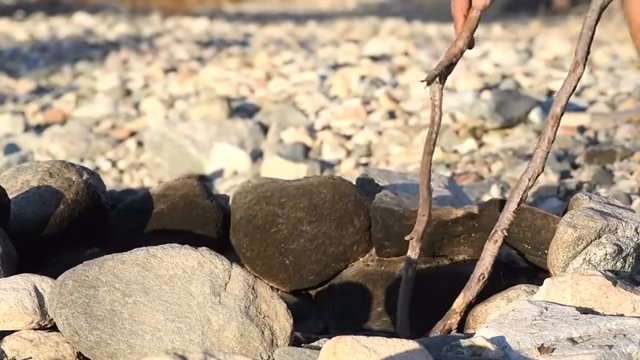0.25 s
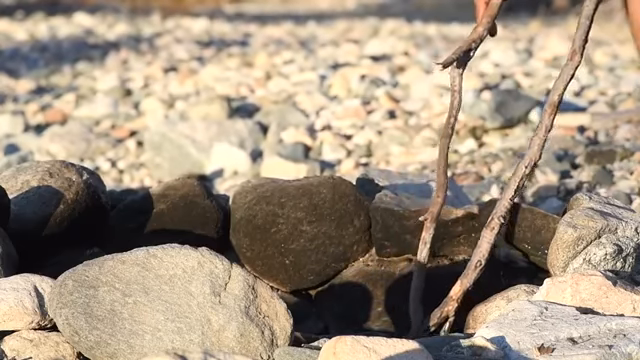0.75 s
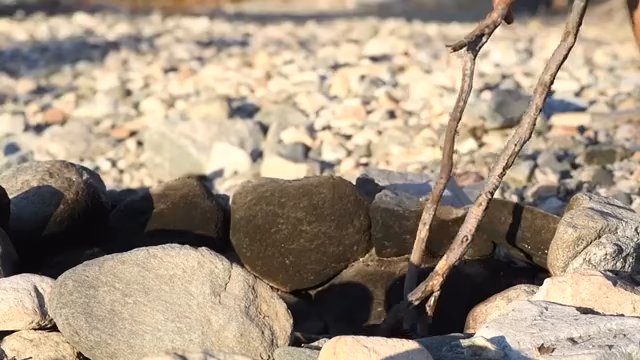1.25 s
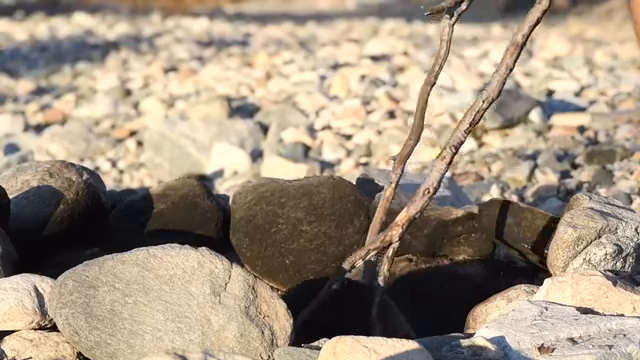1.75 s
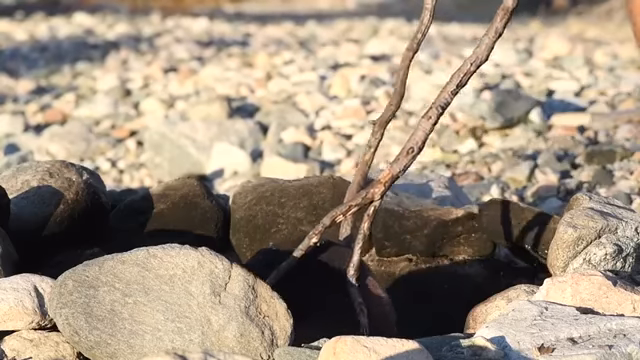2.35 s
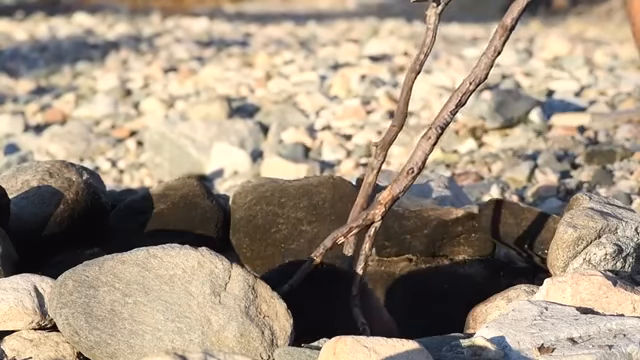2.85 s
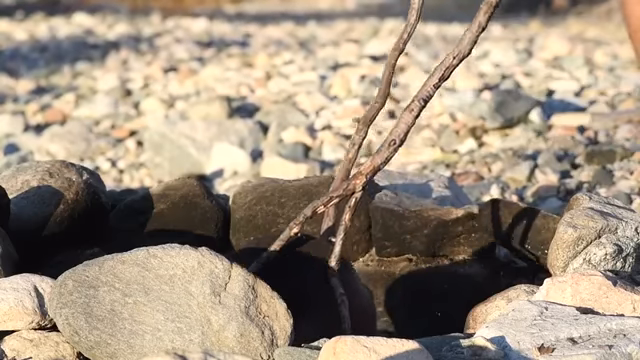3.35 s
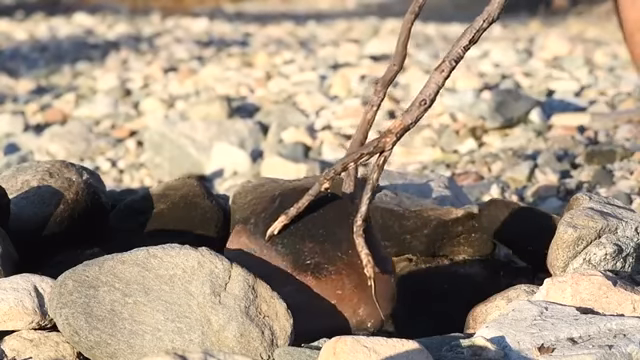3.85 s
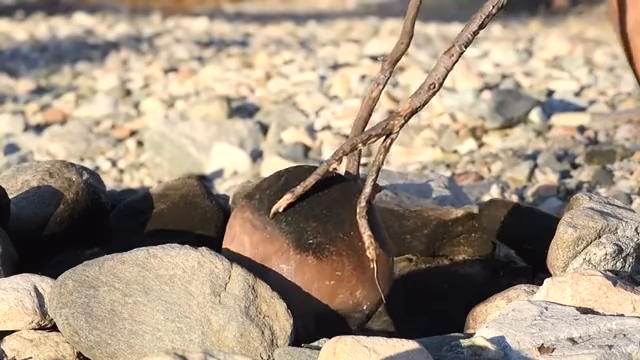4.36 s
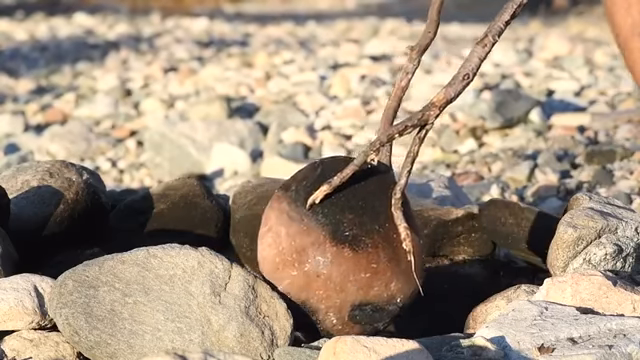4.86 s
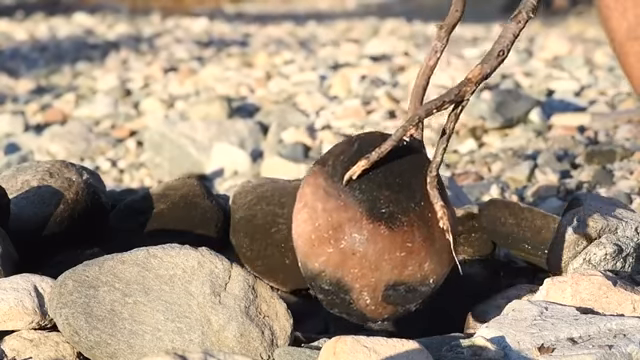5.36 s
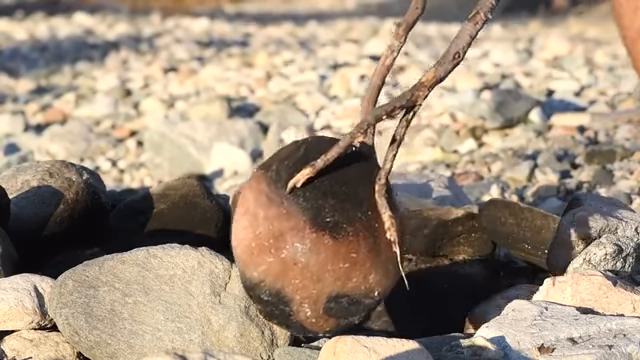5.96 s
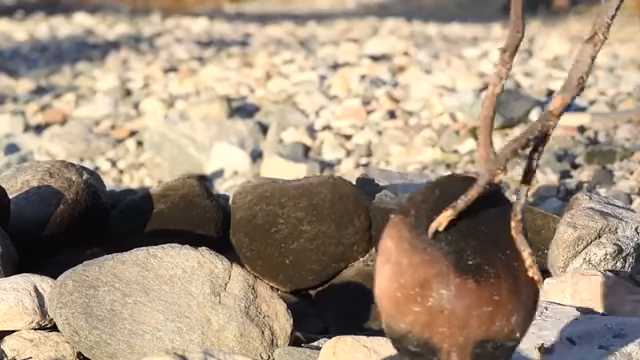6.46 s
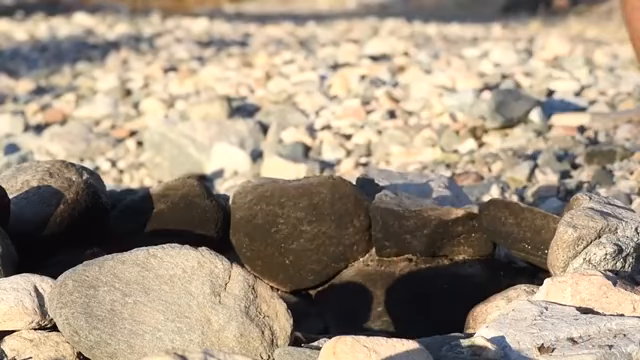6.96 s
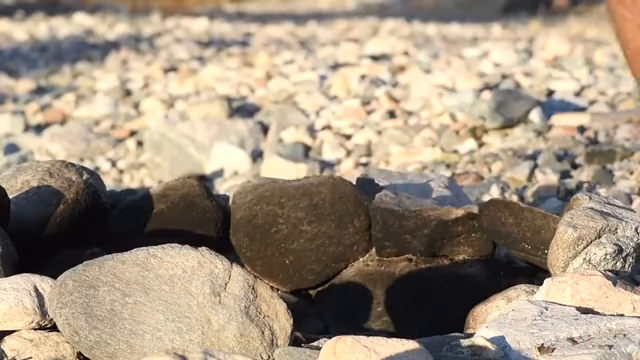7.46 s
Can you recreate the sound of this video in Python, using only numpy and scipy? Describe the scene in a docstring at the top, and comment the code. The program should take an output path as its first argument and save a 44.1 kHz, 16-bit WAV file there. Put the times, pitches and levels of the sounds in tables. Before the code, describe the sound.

A quiet open-air pebble shore, heard close in stereo with faint steady hiss and low rumble. At about 0.1 s a stick and clay pot knock hollowly against stone, ringing briefly with a low hum. Until 1 s, bark rasps over the clay in short dry strokes with little snags around 0.5 s. From 1.1 to 1.4 s the pot grinds grittily, knocks and faintly squeals. Soft, airy rubs follow near 2 s. Around 2.6 s come small taps, then a hard bright clack at 2.75 s. A quiet gap has faint ticks and a light foot contact at 3.2 s. At 3.95 s a low thud and fading scrape; at 4.7 s another thud, rough grinding and short ceramic squeals until 4.85 s. Then mostly quiet: tiny pebble ticks, soft air puff near 6.1 s, and treads crunching gravel from 6.6 s, strongest near 7.6 s.

```python
"""A round clay pot is worked out of a stone hearth by two sticks, on a pebbly shore.
Its knocks are noise bursts over ringing resonators; its grinding is random slips driving the same modes.
Under them pot and ground hum and thump as wavering low sines; single modes squeal; the sticks rub and snag
as grainy noise. Twigs, pebbles and a foot's first contact tick as bursts; feet shift on gravel as noise swells.
Outdoors, steady coloured noise makes a quiet hiss and rumble, with a few puffs of air."""
import sys
import numpy as np
from scipy import signal
from scipy.fft import rfft, irfft
from scipy.io import wavfile

SR = 44100
rng = np.random.default_rng(int(sys.argv[2]) if len(sys.argv) > 2 else 0)


def master_out(mix):
    """Clip the mix to full scale and print it as 16-bit PCM to the path in sys.argv[1]."""
    frames = np.transpose(np.atleast_2d(mix))
    ceiling = np.clip(frames, -1, 1)
    pcm = np.round(ceiling * 32767).astype(np.int16)
    wavfile.write(sys.argv[1], SR, pcm)


N = 339570   # length [samples]
TIME = np.arange(N) / SR   # [s]


def from_db(db):
    """Level: amplitude ratio of a level in dB."""
    return 10 ** (np.asarray(db) / 20)


def rms_one(x):
    """Normalisation: scale to an rms of 1."""
    return x / np.sqrt(np.mean(x ** 2) + 1e-20)


def noise():
    """White noise: equal mean power at all frequencies."""
    return rng.standard_normal(N)


def colour(x, points):
    """Spectral shaping: weight a signal by a curve (frequency [Hz], level [dB]); rms 1."""
    hz, db = np.transpose(points)
    bins = np.maximum(np.fft.rfftfreq(N, 1 / SR), 1)
    gain = from_db(np.interp(np.log(bins), np.log(hz), db))
    return rms_one(irfft(rfft(x) * gain, N))


def butter(x, hz, kind, order=2):
    """Filtering: maximally flat low-pass or high-pass."""
    sos = signal.butter(order, min(hz, SR / 2 - 1), kind, fs=SR, output="sos")
    return signal.sosfilt(sos, x)


def drift(rate):
    """Random modulation: chance values at a rate per second, joined by lines; rms 1."""
    return rms_one(np.interp(TIME * rate, np.arange(N), noise()))


def decay(age, t60):
    """Exponential decay: a fall of 60 dB in t60 seconds."""
    return np.exp(-np.log(1000) * age / t60)


def swell(s, half):
    """Gaussian envelope: a smooth rise and fall about a time."""
    return np.exp(-.5 * ((TIME - s) / half) ** 2)


def held(start, end, rise_s, t60):
    """Driven, then free response: rise, hold while driven, then die away."""
    rise = np.clip((TIME - start) / rise_s, 0, 1)
    return rise * decay(np.maximum(TIME - end, 0), t60)


def swells(times, halves, levels_db):
    """Superposition: the sum of Gaussian envelopes."""
    return sum(from_db(db) * swell(s, half) for s, half, db in zip(times, halves, levels_db))


def grains(per_s, spread_db):
    """Shot noise: random tiny impulses of uneven size and either sign; rms 1."""
    sizes = from_db(spread_db * np.minimum(rng.exponential(1, N), 4))
    signs = rng.choice([-1, 1], N)
    return rms_one(sizes * signs * (rng.random(N) < per_s / SR))


def clicks(times, levels_db):
    """Impulsive force: one sample per blow."""
    out = np.zeros(N)
    np.add.at(out, np.round(times * SR).astype(int), from_db(levels_db))
    return out


def ring(force, modes):
    """Modal superposition: each mode answers the force as a damped two-pole resonator."""
    out = np.zeros(N)
    for hz, db, t60 in modes:
        radius, angle = from_db(-60 / (t60 * SR)), 2 * np.pi * hz / SR
        poles = [1, -2 * radius * np.cos(angle), radius * radius]
        out += from_db(db) * signal.lfilter([0, np.sin(angle)], poles, force + 1e-18)
    return out


WANDER_DB, WANDER_PER_S = 2.8, 35


def driven(force, modes):
    """Forced vibration: a rough force at a wandering contact; a force of rms 1 gives about rms 1."""
    power = sum(from_db(2 * db) * t60 * SR / (4 * np.log(1000)) for hz, db, t60 in modes)
    out = 0
    for mode in modes:
        # as the contact point moves, each mode's share keeps changing
        share = rms_one(from_db(WANDER_DB * drift(WANDER_PER_S)))
        out = out + ring(force * share, [mode])
    return out / np.sqrt(power)


def crowded(x, t60):
    """High modal density: many weak, close modes answer as decaying noise of unit energy."""
    age = TIME[:SR // 4]
    tail = rng.standard_normal(len(age)) * decay(age, t60)
    return signal.fftconvolve(x, tail / np.linalg.norm(tail))[:N]


def cracks(times, levels_db, centres_hz, t60s, octaves, rise_s, tail_db=-22, tail_t60=0.088):
    """Heavily damped dense modes: a short noise burst, then faint scatter among the stones."""
    age = TIME[:SR // 4]
    out = np.zeros(N + len(age))
    for s, db, hz, t60, width in np.broadcast(times, levels_db, centres_hz, t60s, octaves):
        edges = np.minimum(hz * 2 ** (np.array([-.5, .5]) * width), .45 * SR)
        dying = decay(age, t60) + from_db(tail_db) * decay(age, tail_t60)
        shape = from_db(db) * dying * (1 - np.exp(-age / rise_s))
        band = signal.butter(2, edges, "band", fs=SR, output="sos")
        burst = signal.sosfilt(band, shape * rng.standard_normal(len(age)))
        at = int(s * SR)
        out[at:at + len(age)] += burst * np.linalg.norm(shape) / np.linalg.norm(burst)
    return out[:N]


# outdoor hiss common to both sides, and opposed between them: (frequency [Hz], relative level [dB])
AIR_MID_COLOUR = [(12, -33), (20, -4), (33, 0), (108, -2.5), (139, -4.5), (164, -8), (270, -11), (387, -15),
                  (445, -15), (603, -18.5), (818, -20), (1930, -25), (2160, -24.5), (3010, -25.5),
                  (15000, -29)]
AIR_SIDE_COLOUR = [(12, -37), (20, -15), (89, 1.5), (147, -0.5), (169, -8), (199, -13), (294, -6),
                   (328, -15), (409, -12.5), (733, -18), (1020, -21), (2770, -26), (15000, -25.5)]
AIR_DB = -61.5


def outdoors():
    """Diffuse field: steady far hiss and rumble, only partly alike at the two sides."""
    mid = from_db(AIR_DB) * colour(noise(), AIR_MID_COLOUR)
    side = from_db(AIR_DB - 1.0) * colour(noise(), AIR_SIDE_COLOUR)
    return np.array([mid + side, mid - side])


# bark sliding on clay: (time [s], Gaussian half length [s], relative rasp level [dB],
# relative hiss level [dB], lower edge of the hiss [Hz])
RUB_STROKES = [(0.022, 0.051, -59, -62.5, 5200), (0.367, 0.057, -56.5, -55.5, 5300),
               (0.497, 0.056, -58.5, -57.5, 5200), (0.68, 0.076, -62, -64, 5200),
               (0.878, 0.065, -55, -54, 5340), (1.944, 0.018, -73, -65.5, 8550),
               (2.104, 0.043, -71.5, -62.5, 8900), (2.734, 0.051, -66.5, -61.5, 8000)]
# spectrum of bark on clay: (frequency [Hz], relative level [dB])
RUB_SPECTRUM = [(710, -13.5), (1200, -15), (1510, -2), (1810, -18), (2150, 2.5), (2390, -9.5), (2680, -1.5),
                (3800, -5), (4270, -1), (5270, -0.5), (7790, 0), (12100, -4.5), (15000, -9)]
# the bark catches and lets go: (time [s], relative level [dB])
BARK_SNAGS = [(0.3126, -51.5), (0.448, -54), (0.5087, -46), (0.545, -45), (0.5872, -47.5)]
SNAG_HOLD_S, SNAG_T60_S = 0.0014, 0.031
# a stick bumps the pot: (time [s], relative level [dB])
STICK_BUMPS = [(0.0752, -36), (1.1042, -39.5)]
# bending modes of the stick: (frequency [Hz], relative level [dB], t60 [s])
STICK_MODES = [(329, -5.5, 0.19), (384, 3, 0.077)]


def sticks():
    """Friction and flexure: bark rasps, snags and faintly rings the wall; a bump sets the stick flexing."""
    fibres = rms_one(grains(per_s=2600, spread_db=3.5) * from_db(1.5 * drift(rate=70)))
    rub = colour(fibres, RUB_SPECTRUM)
    times, halves, rasp_db, _, _ = np.transpose(RUB_STROKES)
    pressure = swells(times, halves, rasp_db)
    rasp = from_db(-2.5) * pressure * rms_one(butter(rub, hz=4280, kind="low"))
    hiss = 0
    for s, half, _, db, edge in RUB_STROKES:
        hiss = hiss + from_db(db) * swell(s, half) * rms_one(butter(rub, hz=edge, kind="high"))
    snags = 0
    for s, db in BARK_SNAGS:
        snags = snags + from_db(db) * held(s, s + SNAG_HOLD_S, rise_s=0.0012, t60=SNAG_T60_S)
    catching = snags * colour(noise(), RUB_SPECTRUM)
    force = (pressure + snags) * fibres
    rings = from_db(-12.5) * driven(force, WALL_MODES[1:4])
    rings += from_db(-10.5) * driven(force, WALL_MODES[5:])
    flexing = ring(clicks(*np.transpose(STICK_BUMPS)), STICK_MODES)
    return rasp + hiss + catching + rings + flexing


GRIP_S, GRIP_DB = 1.28, -23   # when the sticks close on the pot; gain of the belly's force from then on


def grip(s):
    """Constraint: gain of the force on the belly, full while the pot stands free, low once it is held."""
    return from_db(GRIP_DB * (s > GRIP_S))


# pot against stone: (time [s], thud level [dB], clack level [dB], clack centre [Hz], tick level [dB],
# crack t60 [s], force level on the wall [dB]); levels are relative
POT_KNOCKS = [(0.0625, -32, -38, 1470, -48.5, 0.092, -50), (0.0754, -24, -33, 1360, -41, 0.032, -35),
              (.0825, -55, -52, 2300, -43, 0.19, -38), (0.1106, -60, -52, 4400, -42, 0.16, -49),
              (0.138, -62, -53, 3500, -45.5, 0.039, -52), (1.1026, -48, -62, 1570, -51.5, 0.098, -68),
              (1.2612, -38.5, -42, 3030, -36, 0.034, -53.5), (2.5800, -58, -49.5, 2570, -44.5, 0.15, -58.5),
              (2.639, -60, -39, 2380, -38.5, 0.018, -55.5), (2.7554, -31.5, -21.5, 3000, -20, 0.027, -40.5),
              (2.76, -35, -26.5, 2530, -45, 0.022, -35), (3.939, -33, -56, 5000, -40, 0.015, -51),
              (3.9530, -29.5, -36, 2330, -35, 0.026, -73), (3.976, -39.5, -45, 880, -52, 0.053, -83),
              (4.096, -57, -69, 2800, -47.5, 0.13, -65), (4.182, -57, -73, 3020, -53, 0.22, -64),
              (4.2242, -48, -47.5, 2120, -63, 0.046, -56.5), (4.6803, -26, -42, 2160, -36, 0.0075, -39.5),
              (4.691, -38.5, -50, 950, -58, 0.055, -67), (4.7240, -46, -46, 2850, -48, 0.06, -45),
              (4.793, -54, -50, 4150, -35, 0.087, -39), (4.827, -53, -45, 2200, -43, 0.023, -59)]
# slow bending of the pot's belly: (frequency [Hz], relative level [dB], t60 [s])
BELLY_MODES = [(699, -4, 0.29), (715.7, -4.5, 0.19), (997, -3.5, 0.29), (1034, -3, 0.39), (1524, -7, 0.19)]
# stiffer modes of the wall and rim: (frequency [Hz], relative level [dB], t60 [s])
WALL_MODES = [(1325, -7.5, 0.078), (1536, -3, 0.28), (1584, -6, 0.062), (2108, -4, 0.13),
              (2210, -8.5, 0.19), (2750, -25, 0.099), (2903, -5.5, 0.076), (3075, -13.5, 0.16),
              (3197, -4, 0.075), (4100, -4, 0.084), (4176, -2.5, 0.018), (4303, -3, 0.064),
              (4920, -17, 0.087), (5015, -4, 0.13), (5475, -6, 0.05), (6230, -5, 0.11), (6870, -10, 0.19),
              (6900, -7.5, 0.13), (7450, -2.5, 0.082), (7200, -20, .09), (8200, -29, .11),
              (8510, -3.5, 0.072), (8900, -10, .1), (8600, -18, .09), (9650, -7.5, .08), (9830, -5, .08),
              (10500, -11, 0.11), (10460, -18, .08), (11300, -10, 0.05)]
THUD_HZ, TICK_HZ = 570, 7550
BELLY_KNOCK_DB = -6.5   # against the thud
WALL_EDGE_PER_CLACK = 0.97   # low-pass edge of the force on the wall, as a multiple of the clack's pitch


def knocks():
    """Impact: each blow cracks at the contact and leaves belly and wall in free vibration."""
    s, thud_db, clack_db, clack_hz, tick_db, t60, wall_db = np.transpose(POT_KNOCKS)
    thud = cracks(s, thud_db, THUD_HZ, t60, octaves=1.55, rise_s=0.0022)
    clack = cracks(s, clack_db, clack_hz, t60, octaves=0.56, rise_s=0.0017)
    tick = cracks(s, tick_db, TICK_HZ, t60 * 0.57, octaves=1.45, rise_s=0.00067, tail_db=-53)
    # a longer contact clacks lower and spares the wall's highest modes
    wall_force = 0
    for at, db, hz in zip(s, wall_db, clack_hz):
        wall_force = wall_force + butter(clicks(at, db) + 1e-18, WALL_EDGE_PER_CLACK * hz, "low")
    belly_force = grip(TIME) * clicks(s, thud_db + BELLY_KNOCK_DB)
    return thud + clack + tick + ring(belly_force, BELLY_MODES) + ring(wall_force, WALL_MODES)


# low hums and thumps under the knocks and drags, some from the pot's hollow, some from the ground:
# (start [s], end [s], frequency [Hz], relative level [dB], left over right [dB])
LOW_HUMS = [(0.071, 0.09, 97.8, -37.5, 8.5), (0.075, 0.084, 158.8, -39.5, -1.5),
            (1.109, 1.28, 104.7, -42.5, 9), (2.585, 2.6, 82.6, -35, -6), (2.761, 2.768, 123.2, -44, -2),
            (3.947, 3.994, 79.4, -33.5, -5), (3.955, 3.993, 121.5, -31, -2.5), (4.078, 4.22, 97.7, -44, 4),
            (4.678, 4.81, 83.7, -35, 2), (4.688, 4.87, 106.8, -37, 1)]


def hums_and_thumps():
    """Low resonance: hollow or ground sounds while driven, then dies away, out of step at the two sides."""
    out = np.zeros((2, N))
    skew = np.array([[1], [-1]])   # left, right
    for start, end, hz, db, pan_db in LOW_HUMS:
        phase = 2 * np.pi * hz * (TIME - start) + 0.55 * drift(rate=80)
        level = from_db(db + skew * pan_db / 2 + 3.05 * drift(rate=68))
        out += held(start, end, rise_s=0.02, t60=0.38) * level * np.sin(phase + skew * 1.12)
    return out


# puffs of air on the microphone: (time [s], Gaussian half length [s], level [dB])
AIR_PUFFS = [(.45, 0.1, -45), (3.264, 0.063, -42.5), (6.105, 0.069, -44)]
# spectrum of a puff: (frequency [Hz], relative level [dB])
PUFF_SPECTRUM = [(4, -3), (10, -3), (25, -17), (60, -51), (200, -124)]


def puffs():
    """Turbulent pressure: swells of very low noise, alike at both sides."""
    return swells(*np.transpose(AIR_PUFFS)) * colour(noise(), PUFF_SPECTRUM)


# small ticks of twigs and pebbles, and the sharp first contact of a foot:
# (time [s], relative level [dB], centre [Hz], width [octaves])
SMALL_TICKS = [(1.043, -48, 3130, 0.57), (2.4044, -55.5, 9700, .8), (2.5127, -52, 2680, 0.89),
               (3.2041, -50.5, 600, 3), (4.634, -45, 7700, 0.51), (5.406, -54.5, 2060, 0.44),
               (5.5857, -53, 1090, 1.1), (6.27, -50.5, 1180, 1.3), (6.436, -48, 3540, 0.78),
               (6.582, -51, 7800, 1.1), (6.7875, -51, 800, 2.3), (7.0392, -50, 1580, 2.2)]
TICK_T60_S = 0.021


def small_ticks():
    """Light impact: twigs, pebbles and a foot's sharp first contact are noise bursts, each in its own band."""
    s, db, hz, octaves = np.transpose(SMALL_TICKS)
    return cracks(s, db, hz, TICK_T60_S, octaves, rise_s=0.0005)


# pot dragged along stone: (start [s], end [s], relative first level [dB], change by the end [dB],
# relative grit level against the ringing [dB])
POT_DRAGS = [(1.10, 1.19, -54.5, -0.5, 2), (1.193, 1.28, -54, -2.5, 1.5), (1.285, 1.45, -60.5, -5.5, -1.5),
             (3.938, 4.075, -44.5, -20.5, 0), (4.085, 4.174, -58, -6, 3), (4.179, 4.216, -57, -3, 2),
             (4.676, 4.835, -44, -0.5, 2)]
# sand crushed between clay and stone: (frequency [Hz], relative level [dB])
GRIT_SPECTRUM = [(70, -3), (150, 9), (260, 6.5), (500, -11.5), (870, 7), (1200, -22), (2100, -7.5),
                 (4200, -11.5), (4750, -26), (5400, -38), (10000, -7.5), (12500, -8.5), (15000, -36)]
BELLY_DRAG_DB = -0.5   # against the wall's ringing, before the grip
DRAG_ATTACK_S, DRAG_RELEASE_T60_S = 0.0024, 0.066


def grinding():
    """Stick-slip friction: about 1100 slips a second ring the pot; a drag bites, eases and stops."""
    slips = rms_one(grains(per_s=1100, spread_db=4.2) * from_db(2.2 * drift(rate=110)))
    grind, sand = 0, 0
    for start, end, db, fade_db, grit_db in POT_DRAGS:
        level = from_db(db + np.interp(TIME, [start, end], [0, fade_db]))
        force = held(start, end, DRAG_ATTACK_S, DRAG_RELEASE_T60_S) * level
        grind = grind + force
        sand = sand + force * from_db(grit_db)
    grit = sand * colour(slips, GRIT_SPECTRUM)
    wall = driven(grind * slips, WALL_MODES)
    belly = from_db(BELLY_DRAG_DB) * driven(grip(TIME) * grind * slips, BELLY_MODES)
    return wall + belly + from_db(-7.5) * grit + from_db(-2.5) * crowded(grit, t60=0.045)


# one mode of the pot sings briefly as the clay slips:
# (start [s], end [s], frequency [Hz], relative level [dB])
CLAY_SQUEALS = [(1.197, 1.287, 3985, -55), (1.21, 1.28, 683, -48), (1.252, 1.277, 6778, -53),
                (4.08, 4.183, 2981, -59), (4.727, 4.757, 2980, -41.5), (4.792, 4.81, 4114, -41.5),
                (4.81, 4.837, 2210, -48.5), (4.818, 4.842, 1532, -39), (1.372, 1.408, 2228, -64.5)]


def squeals():
    """Mode locking: slips on one mode sound as a brief wavering tone; higher modes die sooner."""
    waver = from_db(1.4 * drift(rate=67)) * np.exp(.45j * drift(rate=120))
    out = 0
    for start, end, hz, db in CLAY_SQUEALS:
        tone = np.real(waver * np.exp(2j * np.pi * hz * TIME))
        out = out + from_db(db) * held(start, end, rise_s=0.0081, t60=460 / hz) * tone
    return out


# feet shifting on gravel: (time [s], Gaussian half length [s], relative tread level [dB],
# relative crunch level [dB])
FOOT_SCUFFS = [(3.211, 0.0073, -49.5, -86), (4.588, 0.041, -52.5, -55), (5.674, 0.008, -58.5, -66),
               (6.206, 0.54, -74, -70), (6.622, 0.011, -54, -66), (6.801, 0.011, -51, -59.5),
               (7.104, 0.028, -54, -52), (7.389, 0.008, -62, -64), (7.608, 0.015, -48.5, -56),
               (7.67, 0.022, -46.5, -53.5)]
# spectra of the soft tread and of crunching pebbles: (frequency [Hz], relative level [dB])
TREAD_SPECTRUM = [(60, -12.5), (160, -1), (230, 0.5), (380, -3), (560, -15.5), (900, -22.5), (2000, -43)]
CRUNCH_SPECTRUM = [(300, -38), (700, 9), (1300, 4.5), (2000, 4), (3500, -1.5), (5500, -11.5), (10000, -14),
                   (15000, -18)]


def feet():
    """Granular contact: a soft low tread of noise with pebbles crunching as random grains."""
    s, half, tread_db, crunch_db = np.transpose(FOOT_SCUFFS)
    tread = swells(s, half, tread_db) * colour(noise(), TREAD_SPECTRUM)
    gravel = grains(per_s=2400, spread_db=3.2)
    return tread + swells(s, half, crunch_db) * colour(gravel, CRUNCH_SPECTRUM)


# where the pot lies: (time [s], left-right lean [dB])
POT_PLACE = [(1.4, 0.5), (2.6, -2.5), (4.0, -4), (4.8, -2.5), (5.4, -2)]
SIDE_DB = -9   # scattered treble


def hearth(x, scatter_t60, lead_samples):
    """Scattering and interaural delay: stones scatter treble oppositely to the sides; the left leads a hair."""
    scatter = crowded(x, scatter_t60)
    side = from_db(SIDE_DB) * butter(scatter, hz=7000, kind="high", order=1) + from_db(-20) * scatter
    # the pot's place shows below the top treble
    lean_gain = from_db(np.interp(TIME, *np.transpose(POT_PLACE)) / 2) - 1
    lean = lean_gain * butter(x, hz=6000, kind="low", order=1)
    delay = np.exp(-2j * np.pi * np.fft.rfftfreq(N) * lead_samples)
    late = irfft(rfft(x - side - lean) * delay, N)
    return np.array([x + side + lean, late])


def scene():
    """Superposition: pot, sticks and feet among the stones, with low hums and thumps and the open air."""
    near = sticks() + knocks() + small_ticks() + grinding() + squeals() + feet()
    stones = hearth(near, scatter_t60=0.0049, lead_samples=0.71)
    return outdoors() + stones + hums_and_thumps() + puffs()


CUTOFF_HZ = 15000


def record(dry):
    """Band limitation: the microphone softens the highest treble, then the top is cut steeply."""
    soft = butter(dry, hz=14800, kind="low", order=4)
    steep = signal.ellip(10, .1, 80, CUTOFF_HZ, fs=SR, output="sos")
    return signal.sosfilt(steep, soft)


dry = scene()
out = record(dry)
master_out(out)
```